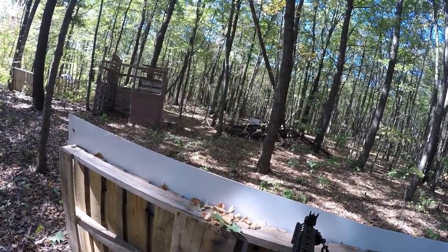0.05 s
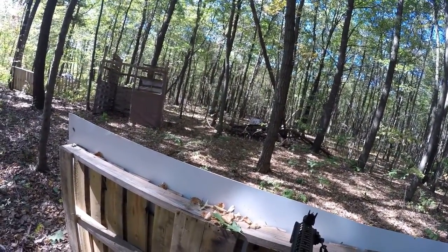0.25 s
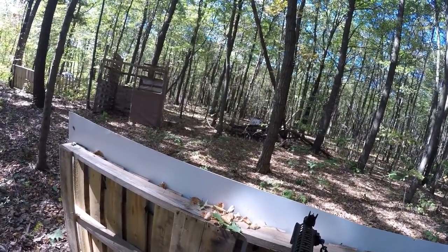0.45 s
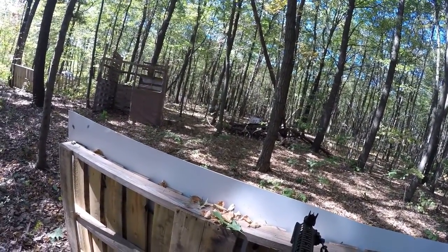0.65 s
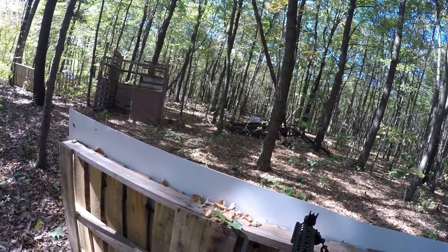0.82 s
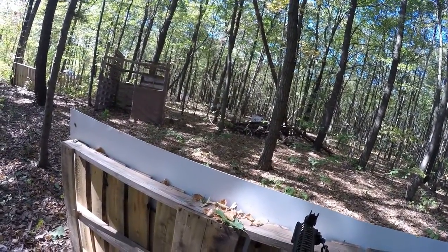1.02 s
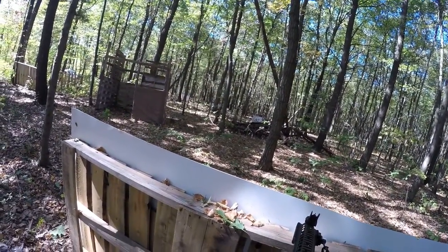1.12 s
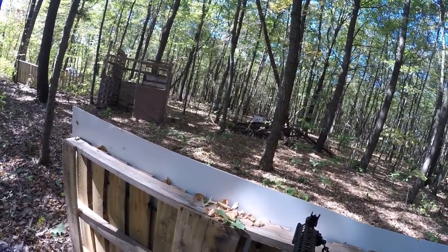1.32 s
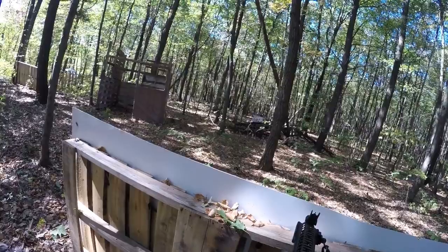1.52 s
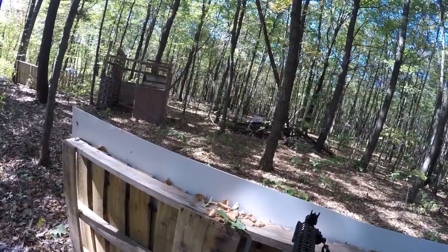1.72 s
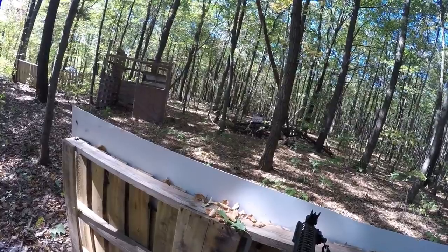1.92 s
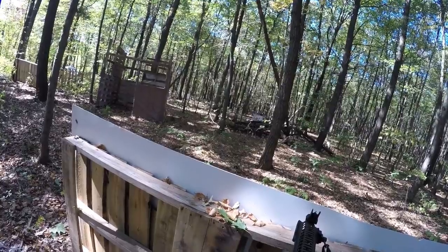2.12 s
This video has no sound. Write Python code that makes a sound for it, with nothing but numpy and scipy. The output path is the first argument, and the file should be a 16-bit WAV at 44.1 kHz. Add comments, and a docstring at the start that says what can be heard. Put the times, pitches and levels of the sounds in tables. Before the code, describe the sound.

Electric airsoft rifle, very close, outdoors in woods. From 0 to 0.15 s four sharp plasticky-metal clacks with gear whir; the motor whines down and a latch clicks at 0.24. It spins up at 0.3, then fires about fifteen rapid clacks from 0.37 to 0.97. Gears run down, clunking at 1.07; a thin spring ring fades over faint ticks, low rumble and quiet air. Two soft knocks near 2.0.

```python
"""The piston of an electric airsoft rifle slams into its cylinder head in two full-auto bursts, about 24 times a second.
Each impact excites damped modes, puffs air from the muzzle and jolts a body-worn microphone close by.
Between impacts a motor winds the spring through a gear train, heard as tooth clatter and a frequency-swept whine.
After each burst the gears run down onto their latch while the spring rings on as a dense, noise-like cluster.
Dry ticks and two soft knocks follow; near reflections, diffuse echoes, air noise and rumble set it in a wood."""
import sys
import numpy as np
from scipy import signal
from scipy.fft import rfft, irfft, next_fast_len
from scipy.io import wavfile
from scipy.ndimage import uniform_filter1d

SR = 44100
rng = np.random.default_rng(int(sys.argv[2]) if len(sys.argv) > 2 else 0)


def generate_wav(sig):
    """Save sig (samples, or channels by samples) to the path in sys.argv[1] as 16-bit PCM at SR."""
    pcm = np.round(np.clip(np.atleast_2d(sig).T, -1, 1) * 32767).astype(np.int16)
    wavfile.write(sys.argv[1], SR, pcm)


N = 94947
TIME = np.arange(N) / SR  # s

# The piston impacts: t/s, then level/dB of gearbox clack, cylinder crack, muzzle pop, contact tick, recoil
SHOTS = [(0.0086, 1, 2.5, 3.5, 4, -5.5), (0.0506, -0.5, -0.5, -0.5, -5, -2.5), (0.0923, -3, 4, -2, 4.5, -5),
         (0.1516, -2, 0.5, 5.5, 0, -2), (0.3714, -3.5, -0.5, -0.5, -3.5, -3.5),
         (0.4215, 0, -2.5, 7.5, -4.0, -2.0), (0.4649, 0, 3.5, 3.5, 6.5, -2.5),
         (0.5074, -0.5, 0.5, -7, 4, -4), (0.5493, -1.5, 0, -1.5, -0.5, -3.5),
         (0.5918, -3, 0.5, 2, -13.5, -2.5), (0.6334, -3.0, 3, -0.5, -9.5, -2),
         (0.6741, 0.5, -2.5, 5, -3, -1), (0.7163, 1.0, 2.5, -6.5, -9, -1.5),
         (0.7575, 0.5, -3.5, 2.5, -0.5, -3), (0.7991, -0.5, -4, 4.5, 0.0, -1.5),
         (0.8408, -0.5, -7, -1.5, 5, -0.5), (0.8824, -0.5, -6.5, 3.5, 4, -0.5),
         (0.9251, -3, -2, 2.5, -5.5, -2), (0.9734, -2.5, -6.5, 0.5, -2.5, -6.5)]
SHOT_TIMES, CLACK_DB, CRACK_DB, POP_DB, TICK_DB, RECOIL_DB = np.transpose(SHOTS)


def from_db(db):
    """Level to amplitude: 20 dB is a factor of ten."""
    return 10 ** (np.asarray(db) / 20)


def rms_one(x):
    """Normalise the signal power: scale to unit rms."""
    return x / np.sqrt(np.mean(x ** 2) + 1e-20)


def curve(rows):
    """Linear interpolation in time between (t/s, value) rows."""
    return np.interp(TIME, *np.transpose(rows))


def coloured(x, points):
    """Minimum-phase filtering: a folded cepstrum makes the (f/Hz, level/dB) response causal."""
    size = next_fast_len(2 * N) // 2 * 2
    hz, db = np.transpose(points)
    grid = np.maximum(np.arange(size // 2 + 1) * SR / size, 1)
    gain = from_db(np.interp(np.log(grid), np.log(hz), db))
    cepstrum = irfft(np.log(gain))
    cepstrum[1:size // 2] *= 2
    cepstrum[size // 2 + 1:] = 0
    response = np.exp(rfft(cepstrum))
    return irfft(rfft(x, size) * response)[:N]


def clicks(times, gains):
    """Ideal impulses: one single-sample click for each time."""
    out = np.zeros(N)
    samples = np.round(np.asarray(times) * SR).astype(int)
    np.add.at(out, np.clip(samples, 0, N - 1), gains)
    return out


def dying(x, t60):
    """Exponential decay: each click starts an envelope that falls 60 dB in t60 seconds."""
    return signal.lfilter([1], [1, -from_db(-60 / (t60 * SR))], x + 1e-18)


def ring(x, hz, t60):
    """Damped resonator: a unit click excites a decaying sine of initial height 1."""
    r = from_db(-60 / (t60 * SR))
    w = 2 * np.pi * hz / SR
    return signal.lfilter([0, np.sin(w)], [1, -2 * r * np.cos(w), r * r], x + 1e-18)


def body(x, modes):
    """Modal superposition: one force drives a set of independent damped resonators."""
    return sum(from_db(db) * ring(x, hz, t60) for hz, db, t60 in modes)


def grit(per_s):
    """Random micro-contacts: sparse Gaussian impulses of unit rms."""
    return rms_one(rng.standard_normal(N) * (rng.random(N) < per_s / SR))


def blow(times, db, rattle_db, rattle_t60, scrape_db=-200):
    """Impact with friction: a scrape that swells, a hard contact, then a dying rattle."""
    flight_s, rise_db = 0.0043, 10  # the scrape grows by this much over one piston flight
    hit = clicks(times, from_db(db))
    swell = dying(hit[::-1], flight_s * 60 / rise_db)[::-1]  # a decay run backwards in time
    rattle = from_db(rattle_db) * dying(hit, rattle_t60)
    return hit + grit(9000) * (rattle + from_db(scrape_db) * swell)


def background():
    """Stationary noise: filtered random pressure gives still forest air and a slow microphone rumble."""
    # Spectra: f/Hz, level/dB
    air_colour = [(59, -30), (100, 0), (166, -5.5), (260, -9), (432, -13.5), (594, -15), (1280, -14),
                  (13400, -27.5), (15900, -30.5)]
    rumble_colour = [(10, 0.5), (18, 3.5), (30, -2.5), (50, -20), (80, -30), (150, -43.5), (400, -78.5)]
    air_db, rumble_db = -62.5, -38
    air = rms_one(coloured(rng.standard_normal(N), air_colour))
    rumble = rms_one(coloured(rng.standard_normal(N), rumble_colour))
    return from_db(air_db) * air + from_db(rumble_db) * rumble


def woodland(x):
    """Reverberation by convolution: quick barricade reflections and a faint scatter from the trunks."""
    # Spectrum of the scatter: f/Hz, level/dB
    wood_colour = [(100, -12), (500, 0), (1200, -14), (3500, -0.5), (6000, -11), (10000, -7),
                   (16000, -25.5)]
    near_db, near_t60_s = -17, 0.032
    wood_db, wood_t60_s = -30, 0.98
    near = grit(1500) * from_db(-60 * TIME / near_t60_s) * (TIME > .004)
    far = grit(4000) * from_db(-60 * TIME / wood_t60_s) * (TIME > .025)
    echoes = from_db(near_db) * rms_one(near) + from_db(wood_db) * rms_one(coloured(far, wood_colour))
    # the division turns unit rms into unit energy
    return signal.fftconvolve(x, echoes / np.sqrt(N))[:N]


def small_sounds():
    """Transient excitation: short noise decays tick drily, and two impacts knock as the rifle is moved."""
    # Small dry ticks, then soft handling knocks: t/s, level/dB
    tick_events = [(1.1292, -34), (1.166, -44.5), (1.252, -47.5), (1.396, -46.5), (1.497, -51),
                   (1.568, -53)]
    knock_events = [(2.004, -0.5), (2.061, -0.5)]
    # Spectra: f/Hz, level/dB
    tick_colour = [(300, -11), (1200, -4.5), (2400, 4), (4000, 2.5), (7500, -4.5), (10000, -14),
                   (15000, -27)]
    knock_colour = [(60, 5), (150, 4), (300, -5), (700, -9.5), (1420, -16.5), (2200, -16.5), (4000, -24),
                    (15000, -33.5)]
    # Resonances of a knock: f/Hz, level/dB, T60/s
    knock_modes = [(60.2, -39.5, 0.35), (120, -58.5, 0.18), (1443, -70, 0.615)]
    times, db = np.transpose(tick_events)
    ticks = coloured(dying(clicks(times, from_db(db)), t60=0.033) * grit(18000), tick_colour)
    knocks = blow(*np.transpose(knock_events), rattle_db=-30, rattle_t60=0.43)
    return ticks + from_db(-9.5) * coloured(knocks, knock_colour) + body(knocks, knock_modes)


def coasting_hum():
    """Amplitude-modulated tone: the stock hums while the gears coast, swelling and fading."""
    # Hums: start t/s, length/s, f/Hz, level/dB
    hums = [(0.149, .15, 108.8, -31), (.97, .08, 126.6, -32)]
    out = np.zeros(N)
    for start, length, hz, db in hums:
        progress = np.clip((TIME - start) / length, 0, 1)
        swell = np.sqrt(np.abs(np.sin(np.pi * progress)))
        out += from_db(db) * swell * np.sin(2 * np.pi * hz * (TIME - start))
    return out


def latch():
    """Modal impact: the gears roll back and are caught with a clunk; only the small parts rattle."""
    # The gears fall back on the latch and bounce: t/s, level/dB
    catches = [(0.241, 0), (1.0719, 2.5), (1.081, -9.5)]
    # Resonances of the latch, the two lowest first: f/Hz, level/dB, T60/s
    latch_modes = [(234, -27, 0.076), (290, -34, .035), (544, -38.5, 0.012), (1155, -36, .012),
                   (1390, -33, 0.0086), (2283, -34.5, .01), (3570, -35.5, .01), (5400, -36, 0.0073)]
    times, db = np.transpose(catches)
    clunk = body(clicks(times, from_db(db)), latch_modes[:2])
    small_parts = blow(times, db, rattle_db=-17.5, rattle_t60=.05, scrape_db=-31.5)
    return clunk + body(small_parts, latch_modes[2:])


def spring():
    """High modal density: the crowded coil modes ring after every shot as decaying filtered noise."""
    # Spectrum of the coil modes: f/Hz, level/dB
    spring_colour = [(1500, -40.5), (2500, -18), (3050, -16), (3320, 3), (3520, -2), (3950, -17),
                     (4700, -10.5), (5500, -21), (9000, -40)]
    spring_db, spring_t60_s = -51, 1
    tail = rms_one(coloured(rng.standard_normal(N), spring_colour))
    # powers of successive shots add; power is amplitude squared, hence half the T60
    power = dying(clicks(SHOT_TIMES, 0.86), spring_t60_s / 2)
    return from_db(spring_db) * np.sqrt(power) * tail


def gear_train():
    """Gear meshing: three meshes clatter and the pinion whines, louder and lower as the spring is drawn."""
    # Nominal motor speed as the tooth rate of its pinion: t/s, f/Hz
    motor = [(0, 4410), (.105, 4409), (.128, 2402), (.15, 1595), (.2, 902.2), (.25, 499.6), (.305, 400),
             (.322, 1299), (.343, 2333), (.385, 4508), (.45, 4435), (.925, 4387), (.955, 3105),
             (.974, 2495), (.982, 1835), (1.03, 1392), (1.05, 496)]
    # Gear train before the slackening: t/s, level/dB
    gear_levels = [(0, -19), (.11, -20), (.16, -35), (.18, -30), (.235, -36.5), (.27, -44.5), (.305, -55),
                   (.324, -30), (.345, -28), (.365, -28.5), (.39, -18), (.65, -19.5), (.93, -20),
                   (1.0, -27), (1.025, -28), (1.047, -44.5), (1.11, -55), (1.16, -80), (1.25, -110)]
    # Spectrum of the clatter: f/Hz, level/dB
    gear_colour = [(260, -34), (450, -9), (868, -8), (1200, 2), (1460, -6), (1720, -6.5), (2000, -9.5),
                   (2290, -4), (2580, -2), (2950, -9), (3370, -5.5), (4040, -13), (4220, -6.5), (4410, -3),
                   (4760, -5.5), (5770, -7), (6320, -14.5), (6910, -17.5), (7780, -12), (9170, -17.5),
                   (10600, -29.5), (11500, -24.5), (12500, -28), (14800, -27.5), (15900, -40)]
    # Meshes: teeth per pinion tooth, level/dB
    meshes = [(0.9, 0), (1 / 3, -5), (20 / 117, 0)]
    pull_s, pull_width_s, slack_db = 0.016, 0.0087, -6.5  # loudest while drawing the spring back
    sag_per_s, wobble_depth = .9, .004  # relative speed loss as the spring tightens; random speed spread
    whine_db, whine_rough, teeth_share = -4.5, 0.27, 0.3
    case_hz, case_width_hz, case_db = 2342, 360, 9  # the whine swells as it passes this resonance

    last_shot = np.maximum(np.searchsorted(SHOT_TIMES, TIME) - 1, 0)
    age = TIME - SHOT_TIMES[last_shot]
    hz = curve(motor)
    driven = np.clip(hz / hz.max(), 0, 1) ** 2 * (age < .05)
    pull = np.exp(-((age - pull_s) / pull_width_s) ** 2)
    wobble = rms_one(uniform_filter1d(rng.standard_normal(N), size=200))
    speed = hz * (1 - sag_per_s * (age - pull_s) * driven + wobble_depth * wobble)
    pinion_teeth = np.cumsum(speed) / SR  # teeth passed so far

    teeth = np.zeros(N)
    for ratio, db in meshes:
        contacts = np.diff(np.floor(pinion_teeth * ratio), prepend=0)
        teeth += contacts * rng.normal(1, .8, N) * from_db(db)
    teeth = signal.lfilter([1], [1, -.9], np.diff(teeth, prepend=0))  # removes the steady part
    colour = [(60, -20.5), (200, -6)] + list(gear_colour)
    clatter = rms_one(coloured(teeth_share * rms_one(teeth) + grit(7000), colour))

    case = from_db(case_db) * np.exp(-((hz - case_hz) / case_width_hz) ** 2)
    whine = np.sin(2 * np.pi * pinion_teeth) * (from_db(whine_db) * pull * driven + case)
    whine = whine * (1 + whine_rough * rms_one(uniform_filter1d(rng.standard_normal(N), size=60)))
    level_db = curve(gear_levels) + slack_db * (1.5 - pull) * driven
    return from_db(level_db) * (clatter + whine)


def recoil():
    """Momentum conservation: the piston's launch and stop jolt the microphone in opposite directions."""
    # Resonances of the jolt: f/Hz, level/dB, T60/s
    recoil_modes = [(27.35, -15.5, 0.14), (48.7, -11.5, 0.15), (115.6, -14.5, 0.086), (174.5, -30, 0.071),
                    (227.7, -24.5, 0.1), (355, -35, 0.087)]
    # The rifle shudders as the motor starts and stops: t/s, f/Hz, level/dB, T60/s
    shudders = [(0.304, 25.6, -19.5, 0.19), (1.011, 40.2, -15.5, 0.063), (1.055, 45, -21, 0.12),
                (1.122, 27.3, -32, 0.28)]
    lag_s, launch_lead_s, launch_share = 0.0013, 0.00571, 0.53  # the spring's opposite kick comes first
    gains = from_db(RECOIL_DB)
    stop = clicks(SHOT_TIMES + lag_s, gains)
    launch = clicks(SHOT_TIMES - launch_lead_s, gains)
    shudder = sum(ring(clicks([t], from_db(db)), hz, t60) for t, hz, db, t60 in shudders)
    return body(stop - launch_share * launch, recoil_modes) + shudder


def muzzle(times, db):
    """Air-column resonance: a puff rings the barrel, whose narrow bore radiates no bass."""
    # Resonances of the barrel: f/Hz, level/dB, T60/s
    muzzle_modes = [(907, -21, .014), (1079, -15.5, .018)]
    bore = signal.butter(2, 720, "high", fs=SR, output="sos")  # Hz
    return body(signal.sosfilt(bore, clicks(times, from_db(db))), muzzle_modes)


def piston():
    """Impact excitation: each slam rings gearbox and cylinder and rebounds; the muzzle pops just after."""
    # Resonances of gearbox, cylinder and contact tick: f/Hz, level/dB, T60/s
    gearbox_modes = [(2430, -26, .01), (2483, -13.5, .011), (2640, -31.5, 0.011), (4996, -19, 0.019),
                     (5570, -21.5, 0.022), (5583, -19, 0.0056), (6300, -24, 0.015), (7600, -34.5, 0.013),
                     (7530, -27, 0.011)]
    cylinder_modes = [(3640, -18, 0.016), (3820, -11.5, 0.017)]
    tick_modes = [(8200, -23, 0.009), (11700, -39, 0.0033), (13800, -25, 0.0029), (14700, -19.5, .0025)]
    # the piston rebounds and hits once more, 1.2 to 7 ms later and 7 dB below the clack
    bounce_times = SHOT_TIMES + rng.uniform(0.001204, 0.007, len(SHOT_TIMES))
    bounce = clicks(bounce_times, from_db(CLACK_DB - 7))
    clack = blow(SHOT_TIMES - .0003, CLACK_DB, rattle_db=-21, rattle_t60=.04, scrape_db=-20.5)
    crack = blow(SHOT_TIMES, CRACK_DB, rattle_db=-26.5, rattle_t60=0.036, scrape_db=-25.5)
    tick = blow(SHOT_TIMES, TICK_DB, rattle_db=-31.5, rattle_t60=.025, scrape_db=-32)
    pop = muzzle(SHOT_TIMES + .001, POP_DB)
    return body(clack + bounce, gearbox_modes) + body(crack, cylinder_modes) + pop + body(tick, tick_modes)


def scene():
    """Linear superposition: the rifle, its echoes and the quiet wood add as pressures."""
    rifle = piston() + gear_train() + spring() + latch()
    at_microphone = recoil() + coasting_hum() + small_sounds() + background()
    return (rifle + woodland(rifle) + at_microphone)[None]


def record(dry):
    """Band-limiting and saturation: steady pressure leaks away, peaks are rounded, the top is cut."""
    leak = signal.butter(1, 4, "high", fs=SR, output="sos")  # Hz
    top_cut = signal.ellip(10, .2, 80, 15500, fs=SR, output="sos")  # ripple dB, stopband dB, Hz
    rounded = 1.276 * np.tanh(signal.sosfilt(leak, dry) / 1.344)
    return signal.sosfilt(top_cut, rounded)


dry = scene()
out = record(dry)
generate_wav(out)
```